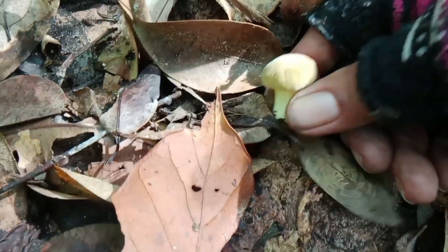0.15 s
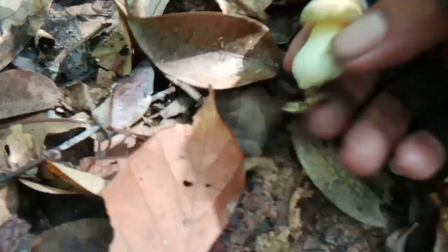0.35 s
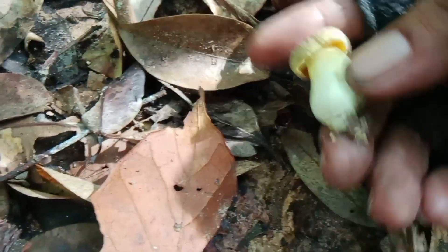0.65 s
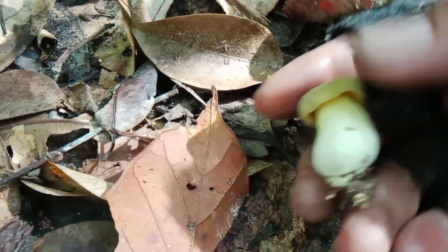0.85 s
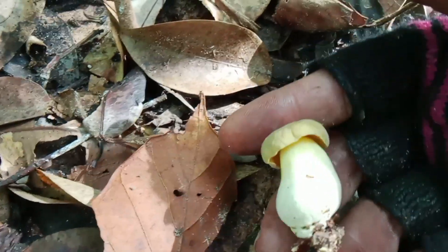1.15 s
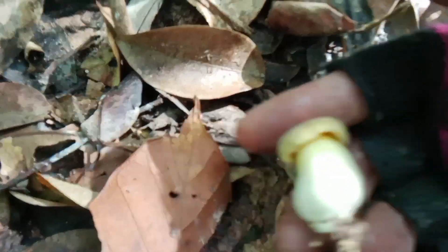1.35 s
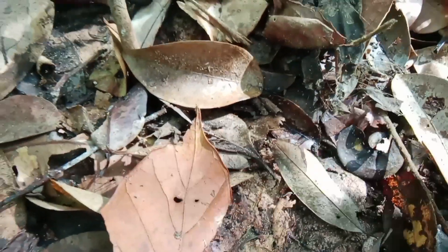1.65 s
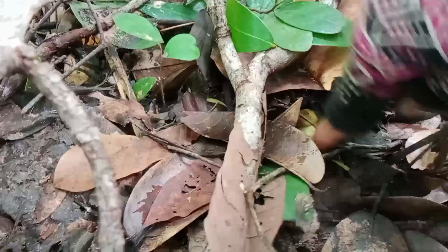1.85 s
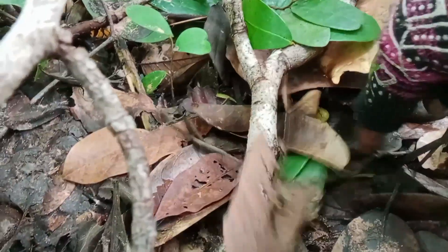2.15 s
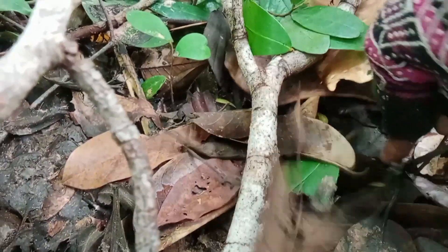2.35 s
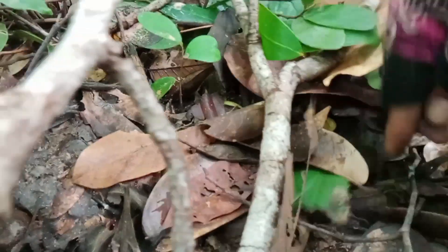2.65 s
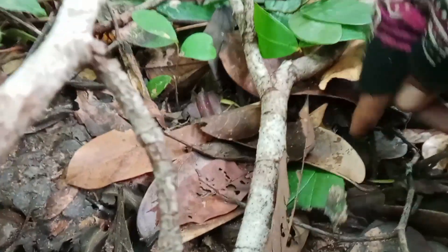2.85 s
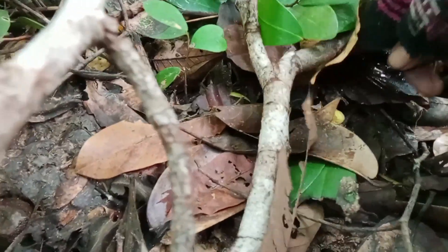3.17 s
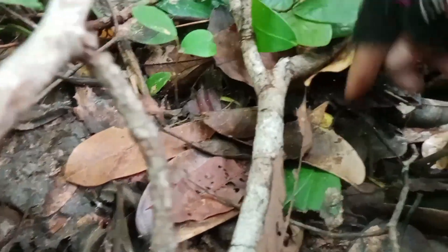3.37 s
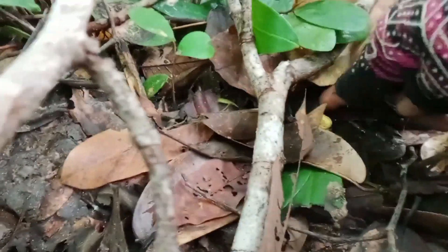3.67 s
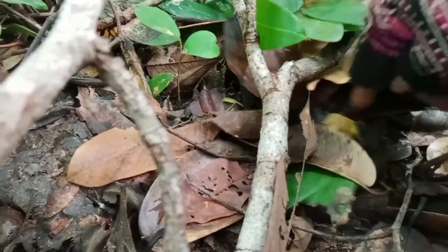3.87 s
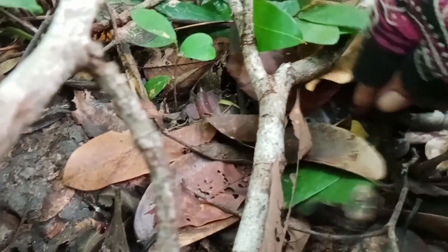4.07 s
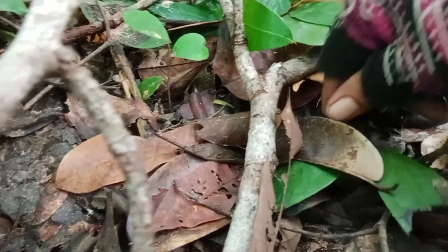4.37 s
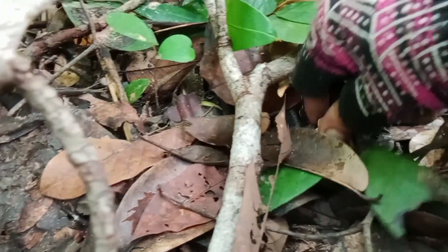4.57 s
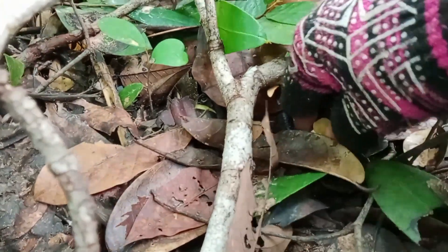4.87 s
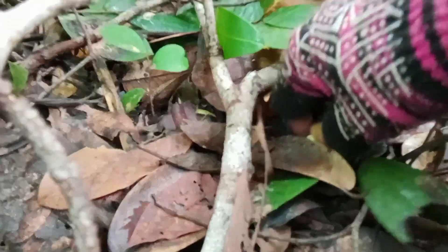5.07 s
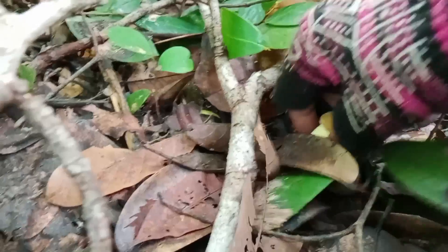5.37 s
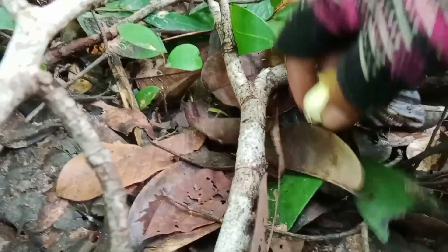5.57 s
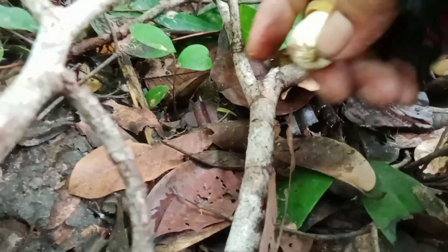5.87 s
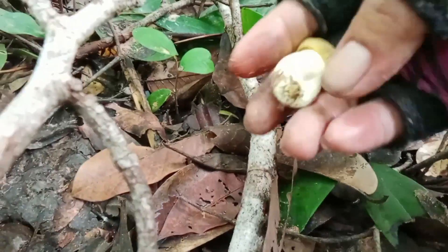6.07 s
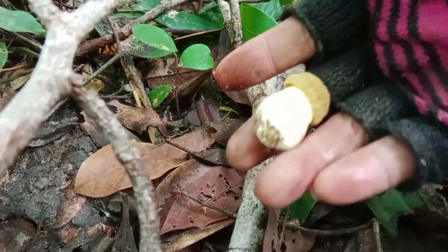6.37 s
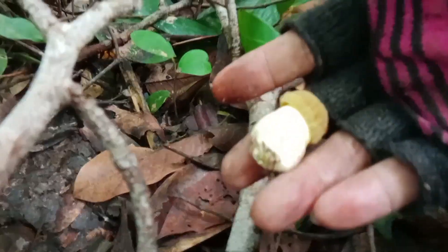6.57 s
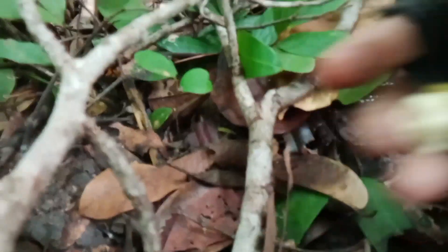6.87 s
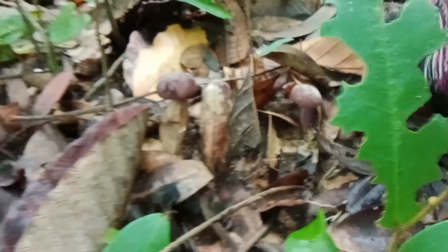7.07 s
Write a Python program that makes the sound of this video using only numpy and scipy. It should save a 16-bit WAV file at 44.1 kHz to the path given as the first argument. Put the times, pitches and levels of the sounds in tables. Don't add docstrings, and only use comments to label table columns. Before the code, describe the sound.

Close dry-leaf rustling, brittle snaps and faint finger touches on the ground, under a high steady insect whine and distant bird notes in woodland.

```python
import sys
import numpy as np
from scipy import signal
from scipy.fft import rfft, irfft
from scipy.io import wavfile
from scipy.ndimage import uniform_filter1d

SR = 44100
rng = np.random.default_rng(int(sys.argv[2]) if len(sys.argv) > 2 else 0)


def voltage_ratio(level):
    return 10 ** (np.asarray(level, float) / 20)


def transcribe(u):
    v = np.clip(np.atleast_2d(u).T, -1, 1)
    q = np.round(v * 32767).astype(np.int16)
    wavfile.write(sys.argv[1], SR, q)


N = 318827

# (cut [s], next shot [s], fade-in [s])
SHOT_GAPS = [
    (1.8424, 1.956, 0.0093),
    (7.098, 7.194, 0.0097),
]

# (frequency [Hz], density [dB per Hz])
HUSH_SPECTRUM = [(25, -45.5), (45, -16.5), (150, -8.5), (300, -13), (1000, -19.5), (3000, -25),
                 (4300, -22.5), (6000, -22.5), (7600, -25), (9800, -35.5), (15700, -41)]
# (time [s], level [dB])
HANDLING_RUMBLE = [
    [(0.0, -85), (0.23, -70), (1.84, -79)],
    [(1.97, -81), (2.03, -61.5), (3.11, -55.5), (3.18, -68), (7.09, -66)],
    [(7.2, -80), (7.23, -91.5)],
]
# (frequency [Hz], density [dB per Hz])
THUD_SPECTRUM = [(50, -33.5), (77, 4), (100, -3), (145, 6), (190, -4), (260, -37)]

# (time [s], low chorus level [dB], middle chorus level [dB])
CHORUS_LEVELS = [
    [(0, -48, -54), (.5, -49, -50.5), (1.0, -49, -55.5), (1.84, -50.5, -54)],
    [(1.97, -53.5, -59.5), (2.16, -47, -49), (2.86, -45.5, -49.5), (3.1, -48.5, -51), (3.75, -48.5, -53.5),
     (4.44, -52.5, -55.5), (4.9, -56.5, -58.5), (5.1, -52.5, -54), (5.8, -54, -56), (6.2, -49, -52.5),
     (6.7, -49.5, -53.5), (6.87, -56.5, -56), (7.09, -48, -56)],
    [(7.2, -66, -69)],
]
# (frequency [Hz], level [dB])
MIDDLE_CHORUS_SPECTRUM = [(6450, -52.5), (6600, -2), (6800, -5.5), (6950, -0.5), (7150, 0.5), (7250, -11.5),
                          (7380, -1.5), (7460, -17.5)]
HIGH_CHORUS_SPECTRUM = [(7700, -31.5), (8000, -15), (8200, 9.5), (8550, 0.5), (8750, -16), (9200, -32.5)]
# (start [s], end [s], first pitch [Hz], last pitch [Hz], level [dB])
SOLO_INSECTS = [(.85, 1.15, 5170, 4980, -60.5), (.8, 1.5, 5037, 5030, -61), (1.96, 3.05, 5240, 5250, -61.5),
                (2.05, 2.6, 5004, 5010, -58), (2.5, 3.0, 5140, 5170, -52), (3.45, 4.0, 5180, 5220, -55),
                (3.5, 3.9, 5110, 5140, -60), (3.8, 4.05, 5110, 5130, -62), (4.1, 4.55, 5210, 5280, -54),
                (4.15, 4.35, 5020, 5040, -57.5), (5.0, 5.3, 5290, 5230, -64), (5.2, 5.5, 5010, 5060, -63.5),
                (6.0, 6.4, 5000, 5012, -55.5), (6.05, 6.45, 5150, 5200, -52.5),
                (6.45, 6.85, 5160, 5210, -55), (6.6, 7.05, 5230, 5180, -58)]
# (start [s], end [s], first pitch [Hz], last pitch [Hz], level [dB])
BIRD_NOTES = [(0, 0.089, 2760, 2450, -65.5), (0, 0.104, 998, 722, -66.5), (0.2, .32, 2380, 2280, -65),
              (0.34, 0.448, 2340, 2300, -68), (0.8, 0.902, 2240, 2380, -64.5),
              (1.478, 1.55, 1110, 1110, -68), (1.775, 1.85, 1230, 1190, -74), (1.77, 1.84, 2440, 2550, -69),
              (5.36, 5.51, 2060, 2150, -67), (5.79, 5.91, 3600, 3630, -74), (5.904, 6.022, 3350, 3050, -71),
              (5.953, 6.023, 2920, 2910, -72), (6.04, 6.12, 3350, 3480, -74), (.0, .13, 4100, 3950, -70),
              (.2, .4, 4050, 4000, -72), (.1, .17, 2560, 2640, -73), (5.42, 5.47, 4060, 4060, -71),
              (6.83, 6.943, 3600, 3370, -71), (6.985, 7.0, 3080, 3050, -63), (6.97, 7.01, 1216, 1208, -56)]

# (start [s], end [s], first pitch [Hz], last pitch [Hz], level [dB])
LEAF_RUBS = [(3.04, 3.09, 400, 400, -38), (3.729, 3.741, 1700, 1000, -26), (5.61, 5.65, 400, 420, -50),
             (5.65, 5.69, 620, 600, -52), (5.49, 5.57, 3100, 2900, -64), (5.52, 5.58, 950, 900, -62),
             (5.38, 5.43, 1000, 1050, -64), (5.42, 5.47, 640, 660, -63), (5.59, 5.63, 1300, 1300, -58),
             (5.69, 5.76, 1500, 1500, -64), (3.705, 3.729, 1600, 2200, -44), (3.368, 3.42, 520, 450, -42),
             (5.79, 5.84, 520, 500, -60), (2.45, 2.475, 2900, 3200, -42), (2.685, 2.73, 220, 200, -44),
             (3.36, 3.42, 2100, 2300, -40), (2.08, 2.18, 600, 580, -52), (2.41, 2.445, 1000, 950, -48),
             (3.2, 3.3, 1500, 1500, -48), (3.64, 3.7, 1700, 2600, -56), (3.91, 3.97, 1900, 1900, -54),
             (4.03, 4.06, 800, 750, -48), (4.2, 4.23, 450, 450, -52), (.0, .06, 300, 250, -62),
             (.16, .27, 1750, 1450, -66), (.3, .45, 3200, 3100, -68), (.85, .875, 3300, 3200, -64),
             (6.92, 6.98, 3150, 2900, -59), (6.8, 6.86, 1700, 1650, -66), (6.98, 7.04, 2500, 2400, -66),
             (2.76, 2.8, 8000, 8000, -54), (2.675, 2.69, 8300, 8300, -44), (2.455, 2.48, 8300, 8300, -52)]
# (frequency [Hz], density [dB per Hz])
SOIL_SPECTRUM = [(120, -24.5), (200, 0), (300, 7), (450, -27.5)]
LARGE_LEAVES = [(90, -51.5), (160, -8), (250, -10.5), (600, -1.5), (800, -5.5), (1100, -2), (1400, -33.5)]
MEDIUM_LEAVES = [(800, -30), (1150, 1.5), (2000, 4), (2300, 3.5), (2900, -18.5)]
SMALL_LEAVES = [(1800, -18), (2400, 4.5), (3300, -0.5), (4250, -3), (4500, -12.5), (5800, -13.5),
                (6400, -34), (7000, -50.5)]
FINE_LEAVES = [(6300, -34.5), (7400, -0.5), (8200, 4), (9200, -5), (9700, -20), (11700, -16), (12100, -26),
               (15600, -42)]
# (time [s], length [s], middle leaves level [dB], small over large leaves [dB])
HAND_SWEEPS = [(2, 0.01, -49, -10.5), (2.02, 0.09, -55.5, 0), (2.118, 0.062, -50.5, 0.5),
               (2.214, 0.035, -44.5, 1.5), (2.262, 0.067, -42.5, 4), (2.345, .025, -55, 4),
               (2.41, 0.033, -51, 3), (2.452, 0.029, -38, 4), (2.491, 0.031, -38.5, -3),
               (2.538, 0.03, -41, 1.5), (2.575, .05, -50, 1.5), (2.63, 0.055, -43.5, 2.5),
               (2.683, 0.032, -37.5, -3.5), (2.75, 0.044, -42, -2.5), (2.819, 0.027, -50.5, -4),
               (2.913, 0.15, -57, -2.5), (3.039, 0.056, -36.5, -4), (3.082, 0.058, -36.5, 2),
               (3.15, 0.035, -42, 7), (3.2, .04, -50, 0), (3.325, .02, -48, 4), (3.223, 0.013, -46, -11.5),
               (3.246, 0.058, -44.5, -1), (3.346, 0.033, -38, 2.5), (3.376, 0.037, -40.5, 4),
               (3.544, 0.04, -60, 3.5), (3.637, 0.13, -54.5, -2.5), (3.7295, 0.007, -34, -2.5),
               (3.906, 0.085, -51, -2), (4.005, 0.034, -40, -1), (4.196, 0.03, -53.5, -12),
               (4.228, 0.03, -53, -6), (4.307, 0.02, -57, 0), (4.493, 0.0053, -48.5, 1)]
# (time [s], length [s], middle leaves level [dB], small over large leaves [dB])
FINGER_TOUCHES = [(.004, 0.038, -62.5, -3), (0.072, 0.036, -66.5, 10), (0.136, 0.081, -71.5, 11),
                  (0.224, 0.032, -61.5, 10), (.323, 0.077, -69.5, 10.5), (0.427, 0.059, -68.5, 7),
                  (0.552, 0.022, -65, 10), (0.738, 0.013, -64.5, -2), (0.833, 0.028, -72.5, 34),
                  (1.5, 0.016, -66.5, 11), (1.588, 0.059, -68, 1), (1.78, .083, -68, 0.5),
                  (4.386, .036, -66.5, -3), (4.584, 0.09, -68.5, -5), (4.701, 0.05, -59.5, -5),
                  (4.81, 0.05, -59, 0), (4.854, 0.026, -59, 0), (5.028, .089, -64, -4),
                  (5.221, 0.015, -50, -3.5), (5.382, 0.077, -65, 1), (5.48, 0.11, -62, -1.5),
                  (5.611, 0.061, -53, -9.5), (5.653, 0.021, -53.5, -2), (5.773, 0.0094, -50, -2),
                  (5.816, 0.0083, -62, -17), (6.284, 0.03, -65.5, -8), (6.769, 0.0096, -58, -11),
                  (6.817, 0.031, -65, 0.5), (6.928, 0.093, -64.5, 5.5), (7.193, 0.032, -57, 2.5)]
# (time [s], length [s], level [dB])
CRUSHED_LEAVES = [(0.226, .03, -68), (0.555, 0.032, -67), (2.46, .1, -54.5), (2.68, 0.0022, -32),
                  (2.655, .004, -46), (2.687, 0.029, -48), (2.26, 0.083, -56.5), (2.75, 0.016, -49.5),
                  (3.033, .14, -44), (3.35, 0.074, -51), (3.575, .004, -57), (3.937, 0.11, -64),
                  (3.957, .005, -47), (4.194, 0.05, -63), (4.727, .03, -67), (4.81, 0.054, -59),
                  (5.216, 0.025, -65), (5.812, 0.0041, -57), (6.776, .006, -65)]

# (time [s], peak level [dB], ring [Hz])
LEAF_SNAPS = [(2.006, -25.5, 1750), (2.219, -28.5, 1600), (2.26, -15.5, 1070), (2.287, -4, 575),
              (2.331, -26, 2940), (2.448, -17, 990), (2.484, -16, 1220), (2.503, -19, 1070),
              (2.6807, -19, 2200), (2.695, -8.5, 570), (2.758, -16, 520), (2.8235, -22, 1300),
              (3.034, -16, 3400), (3.05, -15.5, 2040), (3.066, -19, 2300), (3.096, -17, 1820),
              (3.216, -14.5, 1900), (3.229, -17, 1670), (3.251, -14.5, 1390), (3.272, -25, 3100),
              (3.2965, -15, 1560), (3.352, -12, 1950), (3.384, -13.5, 2010), (3.401, -14.5, 2280),
              (3.73, -10.5, 1500), (3.734, -11, 2200), (3.982, -22, 590), (4.008, -15.5, 1050),
              (4.209, -23, 610), (4.248, -22, 1196),
              (.076, -38, 760), (0.236, -41.5, 1580), (.565, -46, 2820), (.842, -44, 2270),
              (1.617, -39, 2170), (2.061, -37, 1020), (2.143, -38, 585), (2.409, -45, 1800),
              (2.971, -27, 666), (3.137, -28, 1980), (3.338, -26, 1730), (3.557, -36, 2520),
              (3.66, -34.5, 1820), (3.698, -28, 956), (4.257, -28.5, 3000), (4.307, -41, 560),
              (4.37, -42, 1490), (4.489, -21, 2630), (4.722, -40.5, 1530), (5.065, -39, 1050),
              (5.208, -35, 2570), (5.226, -25, 1530), (5.632, -20, 420), (5.665, -23, 650),
              (5.77, -22, 1600), (6.297, -37, 1050), (6.665, -38, 3000), (6.769, -34.5, 3130),
              (6.991, -35, 1240), (7.22, -27, 2340),
              (2.1, -31, 925), (2.427, -26, 1010), (2.455, -24, 3200), (2.543, -23, 990),
               (2.636, -23, 1270), (2.657, -20, 3840), (2.71, -17, 1510), (2.993, -36, 692),
               (3.02, -43, 3000), (3.072, -24, 700), (3.101, -18, 1280), (3.371, -15, 1960),
               (3.926, -32, 538), (4.235, -33, 1320), (4.128, -42, 1500), (5.408, -43, 3240),
               (5.618, -29, 420), (5.655, -35, 1690), (5.668, -29.5, 2120), (5.683, -38, 2530),
               (6.638, -56, 3650), (6.888, -45, 3170), (.25, -43, 3000), (.148, -49, 2700),
               (.58, -44, 1510), (2.469, -18, 520), (2.478, -22, 1700), (2.516, -17, 400),
               (2.52, -27, 3600), (2.548, -27, 3900), (2.562, -25, 1500), (2.697, -21, 2500),
               (2.704, -18, 800), (2.719, -21, 1700), (2.768, -20, 600), (3.051, -9, 420),
               (3.074, -11, 350), (3.219, -20, 500), (3.738, -13, 850), (3.7345, -11, 1150),
               (2.261, -23, 3200), (5.6, -38, 1900), (5.771, -25, 2800), (5.816, -45, 1800),
               (.078, -46, 4300), (.252, -46, 4100), (4.012, -24, 2200), (4.49, -29, 3800),
               (.57, -46, 4200)]
# (frequency [Hz], level [dB])
SNAP_SPECTRUM = [(70, -35), (250, -10.5), (600, -9), (2000, 3), (4200, -5), (4600, -12.5), (6400, -13.5),
                 (8200, -14.5), (9700, -55), (14000, -49)]

# (frequency [Hz], level [dB])
PORT_RESPONSE = [(9200, 1), (9700, -3.5), (10200, -3.5), (10800, -11.5), (11400, 2.5), (12000, -19),
                 (12900, -8.5), (13200, -1.5), (13800, -11), (14200, -10), (15000, -12), (15500, -13)]
# (low edge [Hz], high edge [Hz], level under recent rustle [dB])
MUTED_BANDS = [(5550, 5950, -30), (5950, 6350, -30), (9700, 10300, -42), (10300, 10900, -44),
               (11900, 12400, -49), (12400, 12900, -50), (14100, 14900, -58), (14900, 15700, -60)]


def in_time(tables):
    s, *columns = np.transpose(np.concatenate(tables))
    return [np.interp(np.arange(N) / SR, s, column) for column in columns]


def rms_one(x):
    return x / np.sqrt(np.mean(x ** 2) + 1e-20)


def evened(x, seconds):
    return x / np.sqrt(np.abs(uniform_filter1d(x ** 2, size=round(seconds * SR))) + 1e-20)


def colour(x, spectrum, beyond_db=-20):
    size = 4096
    hz, db = np.transpose(spectrum)
    grid = np.log(np.arange(size // 2 + 1) * SR / size + 1)
    response_db = np.interp(grid, np.log(hz), db, left=db[0] + beyond_db, right=db[-1] + beyond_db)
    cepstrum = irfft(np.log(voltage_ratio(response_db)))
    cepstrum[1:size // 2] *= 2
    cepstrum[size // 2 + 1:] = 0
    return signal.fftconvolve(x, irfft(np.exp(rfft(cepstrum))))[:N]


def drift(rate_hz):
    r = np.exp(-80 * np.pi * rate_hz / SR)
    noise = rng.standard_normal(N // 40 + 2002)
    slow = signal.lfilter([1], [1, -2 * r, r * r], noise)[2000:]
    return np.interp(np.arange(N) / 40, np.arange(len(slow)), rms_one(slow))


def hush():
    air_db = -67.5 + 1.2 * drift(2.5) + 1.6 * drift(12)
    air = voltage_ratio(air_db) * rms_one(colour(rng.standard_normal(N), HUSH_SPECTRUM))
    rumble_db = in_time(HANDLING_RUMBLE)[0] - 0.3 + 2.8 * drift(8.3)
    return air + voltage_ratio(rumble_db) * rms_one(colour(rng.standard_normal(N), THUD_SPECTRUM))


def singers(centre_hz, spread_hz, blur_hz, swell_db, count):
    out = 0
    for offset in np.linspace(-1, 1, count) + rng.normal(0, 0.37 / count, count):
        hz = centre_hz + spread_hz * offset + blur_hz * drift(12)
        loud = voltage_ratio(swell_db * drift(12.3) - 11.9 * offset ** 2)
        out = out + loud * np.sin(2 * np.pi * np.cumsum(hz) / SR + rng.uniform(0, 2 * np.pi))
    return evened(out, 0.15)


def insects():
    low_db, middle_db = in_time(CHORUS_LEVELS)
    first_shot = np.arange(N) / SR < SHOT_GAPS[0][1]
    low_hz = np.where(first_shot, 5098, 5145)
    low_spread_hz = np.where(first_shot, 200, 165)
    low = singers(low_hz, low_spread_hz, blur_hz=14, swell_db=5.5, count=13)
    middle = singers(6963, spread_hz=450, blur_hz=28.13, swell_db=5.0, count=16)
    middle = rms_one(colour(middle, MIDDLE_CHORUS_SPECTRUM))
    high = colour(rng.standard_normal(N), HIGH_CHORUS_SPECTRUM) * voltage_ratio(2.0 * drift(14))
    faint = singers(4100, spread_hz=45, blur_hz=45, swell_db=4.0, count=3)
    faint = faint * voltage_ratio(-86 + 2.5 * drift(3))
    return voltage_ratio(low_db) * low + voltage_ratio(middle_db) * middle + voltage_ratio(-73.5) * rms_one(high) + faint


def gliding_notes(notes, steady, flicker_hz):
    t, out = np.arange(N) / SR, np.zeros(N)
    for start, end, first_hz, last_hz, db in notes:
        span = slice(round(start * SR), round(end * SR))
        along = (t[span] - start) / (end - start)
        phase = 2 * np.pi * np.cumsum(first_hz + (last_hz - first_hz) * along) / SR
        out[span] += voltage_ratio(db) * np.sqrt(np.abs(np.sin(np.pi * along))) * np.cos(phase)
    return out * (steady + drift(flicker_hz))


def birds():
    return gliding_notes(BIRD_NOTES, steady=0.6, flicker_hz=70)


def solo_insects():
    return gliding_notes(SOLO_INSECTS, steady=1.5, flicker_hz=6.6)


def rubs():
    return gliding_notes(LEAF_RUBS, steady=0, flicker_hz=200)


def leaf_rings(grains, cycles, patchy_db):
    pitches = np.geomspace(300, 9000, 14)
    dealt, out = rng.integers(0, len(pitches), N), 0
    for k, hz in enumerate(pitches):
        r, w = voltage_ratio(-60 * hz / (cycles * SR)), 2 * np.pi * hz / SR
        touched = grains * (dealt == k) * voltage_ratio(patchy_db * drift(8.9)) + 1e-18
        ring = signal.lfilter([0, np.sin(w)], [1, -2 * r * np.cos(w), r * r], touched)
        out = out + hz ** 0.62 * ring
    return rms_one(out)


def layer_levels(length, db, lean_db):
    soil_db = -66 + 1.5 * (db + 51) - lean_db
    finest_db = -65.5 + (db + 49.0) + 2.5 * np.log2(length / 0.023)
    return [soil_db, db - 1 - lean_db / 2, db, db - 1 + lean_db / 2, finest_db]


def strokes():
    power, t = np.zeros((5, N)), np.arange(N) / SR
    moves = [(s, length, layer_levels(length, db, lean_db))
             for s, length, db, lean_db in HAND_SWEEPS + FINGER_TOUCHES]
    moves += [(s, length, [-200, -200, -200, -200, db]) for s, length, db in CRUSHED_LEAVES]
    for s, length, sizes_db in moves:
        span = slice(max(round((s - 0.06) * SR), 0), round((s + length + 0.25) * SR))
        haste = max(1, 0.019 / length)
        ease = min(1, 0.07 / length) ** 1.6
        rise_db = np.minimum(0, haste * ease * 3200 * (t[span] - s))
        after = np.maximum(0, t[span] - s - length)
        fall = voltage_ratio(-haste * 649 * after)
        settling = voltage_ratio(-19.5 - 111.5 * after)
        shape = voltage_ratio(rise_db) * (fall + settling)
        power[:, span] += np.outer(voltage_ratio(np.array(sizes_db)), shape) ** 2
    return np.sqrt(power)


def rustle():
    clumps = voltage_ratio(2.5 * drift(70))
    born = rng.random(N) < 2600 * clumps / SR
    sizes = voltage_ratio(1.4 * np.minimum(rng.exponential(1, N), 3))
    ticks = rms_one(born * sizes * rng.choice([-1, 1], N))
    rings = leaf_rings(ticks, cycles=22.0, patchy_db=7.5)
    grains = 0.33 * ticks + 0.85 * rings + 0.71 * rng.standard_normal(N)
    spectra = (SOIL_SPECTRUM, LARGE_LEAVES, MEDIUM_LEAVES, SMALL_LEAVES, FINE_LEAVES)
    leaves = [evened(colour(grains, spectrum), 0.11) for spectrum in spectra]
    leaves[-1] = leaves[-1] * voltage_ratio(3 * drift(30) - 1)
    return voltage_ratio(-4.0) * np.sum(strokes() * leaves, axis=0)


def snaps():
    size = 4096
    out, t = np.zeros(N + size), np.arange(size) / SR
    grid = np.arange(size // 2 + 1) * SR / size + 1
    rise = 1 - np.exp(-t / 0.0009)
    crack_shape = rise * (voltage_ratio(-60 * t / 0.012) + 0.11 * voltage_ratio(-60 * t / 0.05))
    for s, peak_db, hz in LEAF_SNAPS:
        ring_t60 = 0.017 * (hz / 1000) ** -0.4
        ring = rise * np.sin(2 * np.pi * hz * t) * voltage_ratio(-60 * t / ring_t60)
        near_pitch = 0.16 + np.exp(-(np.log2(grid / hz) / 0.8) ** 2)
        noise = rms_one(irfft(rfft(rng.standard_normal(size)) * near_pitch))
        crack = (hz / 1600) ** 0.23 * noise * crack_shape
        at = round(s * SR)
        out[at:at + size] += voltage_ratio(peak_db - 3.5) * (0.57 * ring + 0.67 * crack)
    return colour(out[:N], SNAP_SPECTRUM)


def muted(x):
    hz, s, cells = signal.stft(x, SR, nperseg=1024)
    power = np.abs(cells) ** 2 + 1e-20
    keep = np.exp(-s[1] / 0.1)
    rustling = power[(hz > 500) & (hz < 4000)].mean(axis=0)
    recent = signal.lfilter([1 - keep], [1, -keep], rustling)
    frame_at = np.minimum(s * SR, N - 1).astype(int)
    for low_hz, high_hz, under_db in MUTED_BANDS:
        band = (hz >= low_hz) & (hz < high_hz)
        level = uniform_filter1d(power[band].mean(axis=0), size=3)
        threshold_db = under_db + 3.0 * drift(6)[frame_at]
        cells[band] *= np.where(level < recent * voltage_ratio(2 * threshold_db), voltage_ratio(-25), 1)
    return signal.istft(cells, SR, nperseg=1024)[1][:N]


def scene():
    background = hush() + insects() + birds() + solo_insects()
    hand = rubs() + rustle() + snaps()
    return (background + hand)[None]


def top_cut(x):
    return signal.sosfilt(signal.butter(12, 15700, fs=SR, output="sos"), x)


def record(dry):
    t, gain = np.arange(N) / SR, np.ones(N)
    for cut, start, fade in SHOT_GAPS:
        before = np.clip((cut - t) / 0.0007, 0, 1)
        after = np.clip((t - start) / fade, 0, 1)
        gain *= np.maximum(before, after)
    heard = muted(colour(dry[0], PORT_RESPONSE, beyond_db=0))
    return top_cut((heard * gain)[None])


dry = scene()
out = record(dry)
transcribe(out)
```